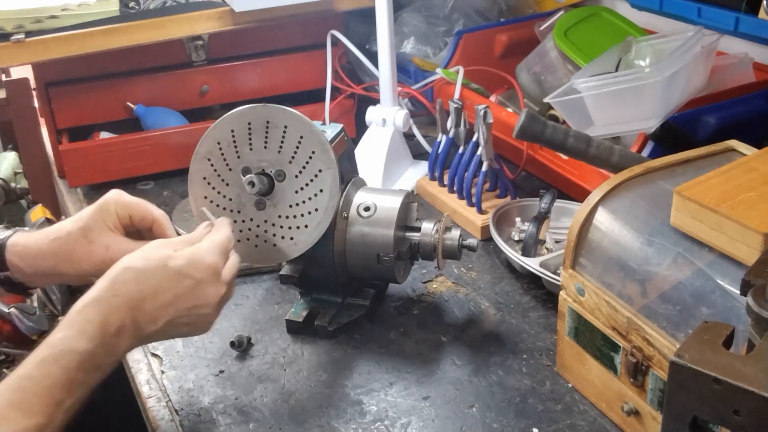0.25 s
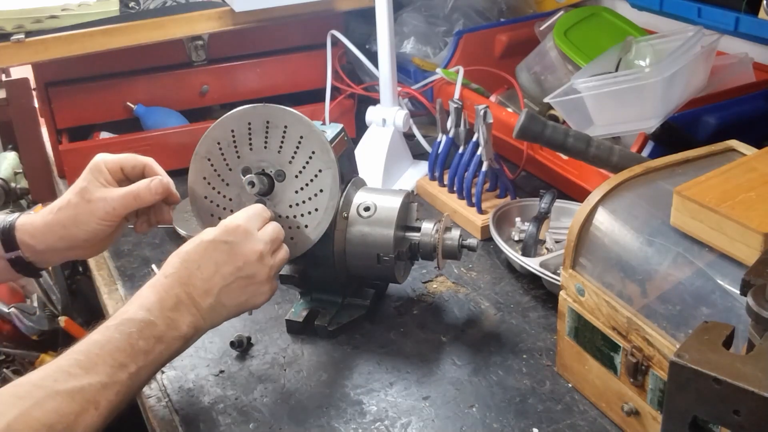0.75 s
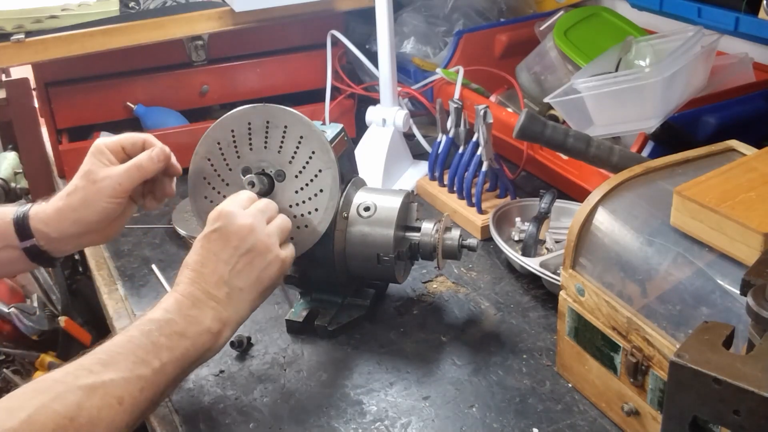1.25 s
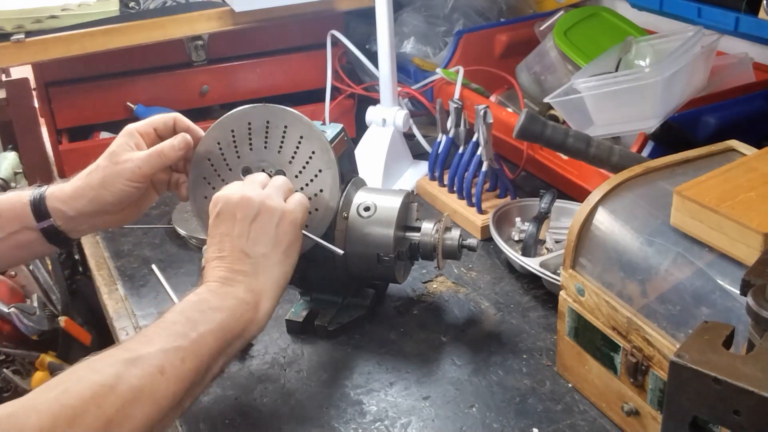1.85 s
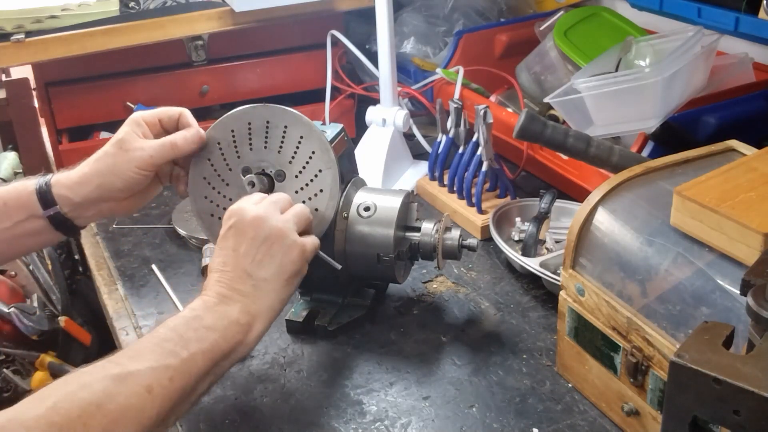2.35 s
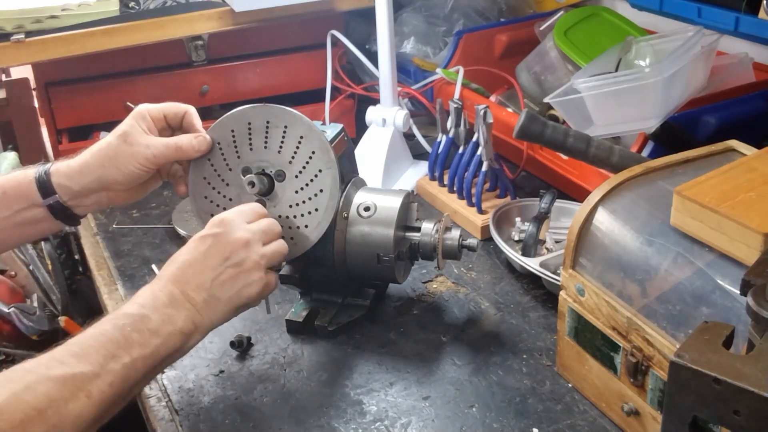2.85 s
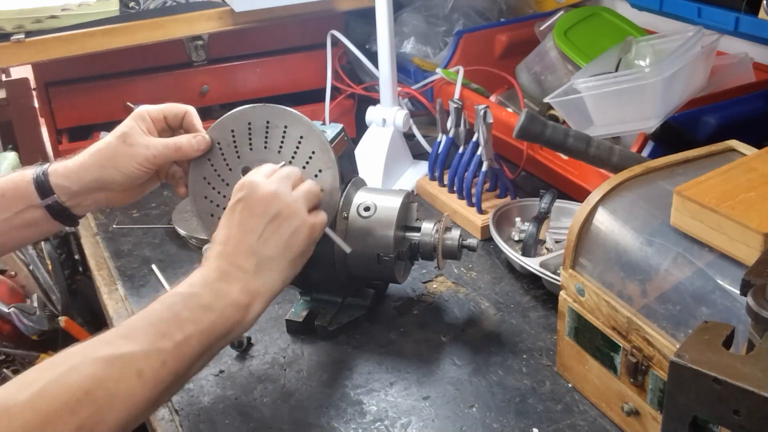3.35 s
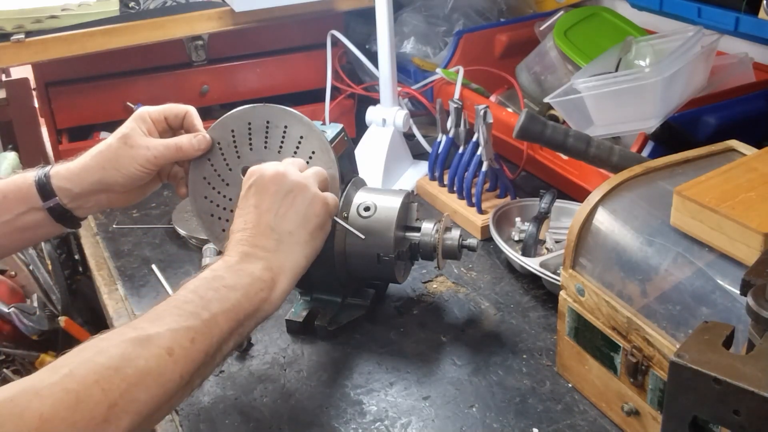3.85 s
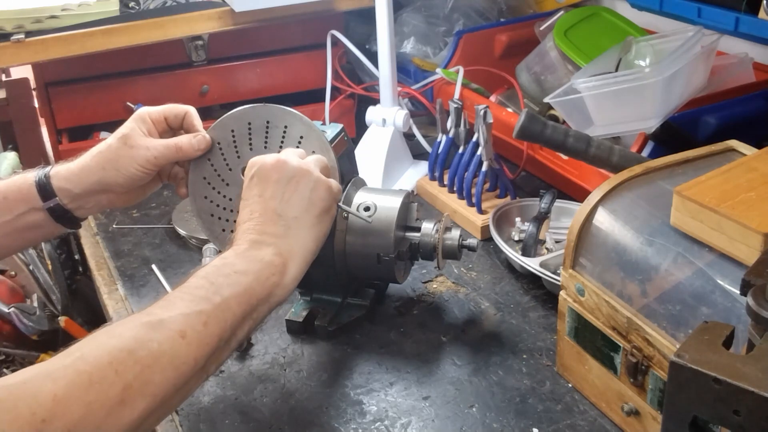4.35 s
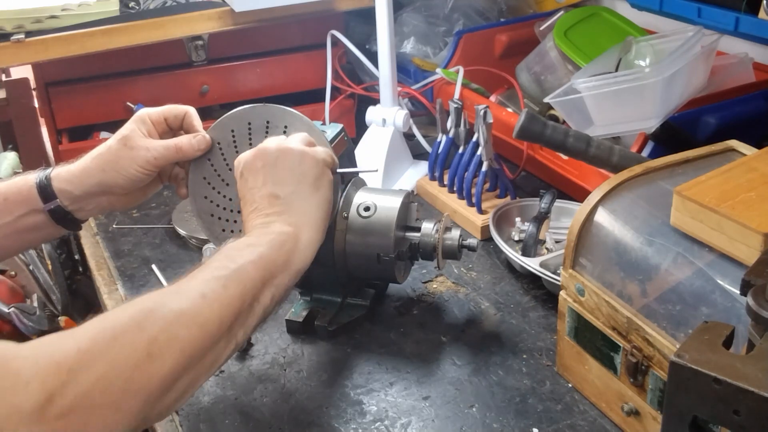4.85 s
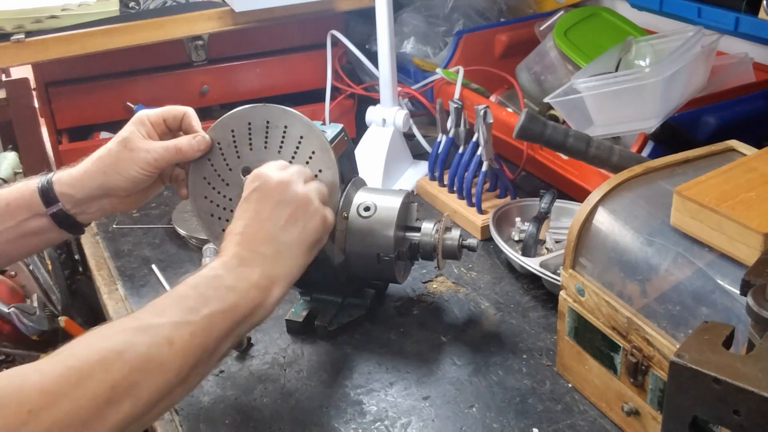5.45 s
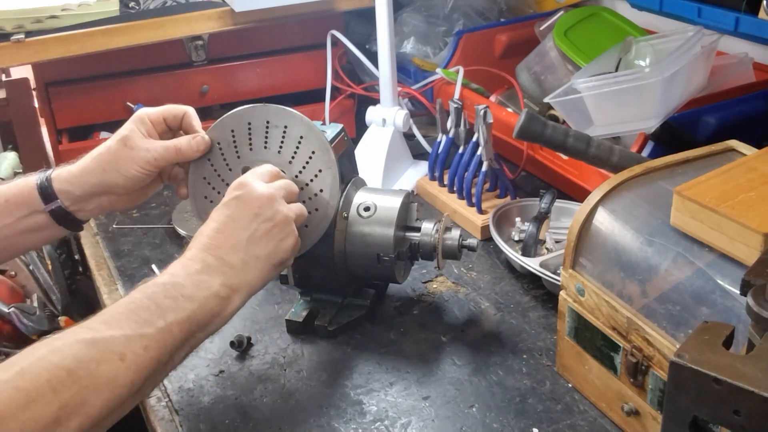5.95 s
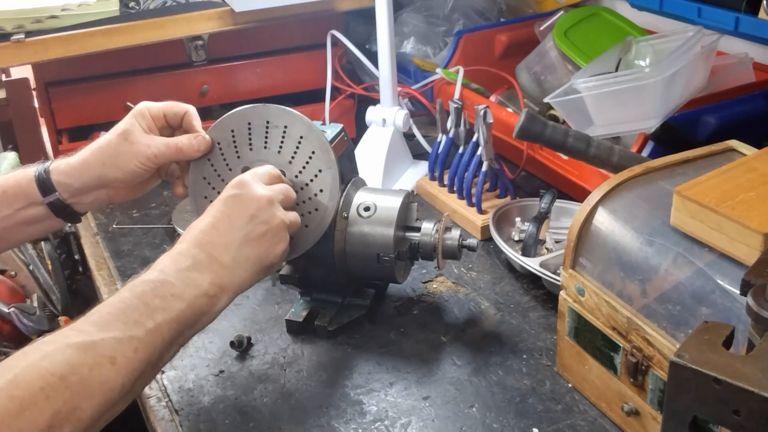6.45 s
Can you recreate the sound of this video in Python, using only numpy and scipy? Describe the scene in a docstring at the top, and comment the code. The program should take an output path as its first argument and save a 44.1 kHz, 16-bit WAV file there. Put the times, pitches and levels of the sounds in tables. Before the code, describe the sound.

A mechanical clock ticks and tocks from start to finish, a little more than two beats a second, each beat with a slight steely ring and the short echo of a small workshop. Under it lie a faint, steady rumble, hiss and hum. Close by, a hex key knocks softly on a steel plate at about 0.8 seconds and again, with more ring, at 2.1 seconds. Fingers brush the metal very faintly now and then. At about 3.1 seconds the key slides briefly and clinks, then seats in a screw with a sharp clank at 3.8 seconds, followed by several quick, bright clinks up to 4.2 seconds. Another small scrape and a few lighter clicks come around 4.5 to 4.7 seconds, and a last soft clink at 5.6 seconds. The clock then ticks on alone until the end, at about 6.7 seconds.

```python
"""From the start, a mechanical clock ticks and tocks over the rumble, hiss and hum of a small workshop:
its pallets strike the escape wheel, exciting the modes of the case. At 0.8 and 2.1 s a hex key knocks on
a steel dividing plate close by, and fingers brush the metal. From 3.1 to 5.7 s the key slides, seats and
clinks in the screws, each impact ringing key and plate. Then the clock is left beating in the room."""
import sys
import numpy as np
from scipy import signal
from scipy.fft import rfft, irfft
from scipy.io import wavfile
from scipy.ndimage import uniform_filter1d

SR = 44100
rng = np.random.default_rng(int(sys.argv[2]) if len(sys.argv) > 2 else 0)


def waveform_to_disk(signal):
    """Save audio, clipped to [-1, 1], as 16-bit WAV at the path in sys.argv[1]."""
    frames = np.transpose(np.atleast_2d(signal))
    scaled = np.clip(frames, -1, 1) * 32767
    samples = np.round(scaled).astype(np.int16)
    wavfile.write(sys.argv[1], SR, samples)


N = 295911
SIZE = 16384   # samples in one short sound; HZ and AGE are its frequency and time axes
HZ = np.maximum(np.fft.rfftfreq(SIZE, 1 / SR), 1)
AGE = np.arange(SIZE) / SR


def from_db(db):
    """Amplitude grows tenfold for every 20 dB."""
    return 10 ** (np.asarray(db) / 20)

def at_hz(points, hz):
    """Interpolation of a table along log frequency."""
    points = np.array(points)
    return np.interp(np.log(hz), np.log(points[:, 0]), points[:, 1])

def at_time(points, s):
    """Linear interpolation of a table along time."""
    return np.interp(s, *np.transpose(points))

def unit(x):
    """Normalisation of each channel to unit energy."""
    return x / np.sqrt(np.sum(x ** 2, axis=-1, keepdims=True) + 1e-20)

def stereo(mid, side, coherence):
    """Interaural coherence sets the shares of a common and an opposed signal."""
    return np.sqrt(1 + coherence) * mid + np.sqrt(1 - coherence) * side * [[1], [-1]]

def resonances(modes):
    """Modal superposition: steep-sided peaks sum to a body's power response."""
    return sum((from_db(db) / (1 + (2 * (HZ - hz) / width) ** 2)) ** 2 for hz, width, db in modes)

def brightness(tilt_db, pivot_hz):
    """Spectral tilt above 2 kHz, as a power gain: makes a tick or knock brighter or duller."""
    return from_db(tilt_db * np.log2(np.maximum(HZ, 2000) / pivot_hz)) ** 2

def ringing(power):
    """Causality: folding the cepstrum turns a power response into a minimum-phase ring."""
    cepstrum = irfft(np.log(power + 1e-12) / 2)
    cepstrum[1:SIZE // 2] *= 2
    cepstrum[SIZE // 2 + 1:] = 0
    return irfft(np.exp(rfft(cepstrum)))

def through(x, response):
    """Convolution of a short sound with a stereo impulse response."""
    return signal.fftconvolve(np.atleast_2d(x), response, axes=-1)[:, :SIZE]

def add(track, s, sound):
    """Superposition of a short stereo sound on the track at s seconds."""
    start = int(np.clip(round(s * SR), 0, N - 1))
    track[:, start:start + SIZE] += sound[:, :N - start]

def scatter(envelope, coherence, whitenings=3):
    """Dense random arrivals sum to noise under an envelope; whitening evens its spectrum."""
    x = stereo(*rng.standard_normal((2, SIZE)), coherence) * envelope
    onset = np.minimum(1, 2 * np.maximum.accumulate(envelope) / envelope.max())
    for _ in range(whitenings):
        spectrum = rfft(x)
        local_power = uniform_filter1d(np.abs(spectrum) ** 2, size=40, axis=-1)
        x = irfft(spectrum / np.sqrt(local_power + 1e-12)) * onset
    return unit(x)


# The room's noise floor. Each row: frequency in Hz, spectral density in dB.
ROOM_SPECTRUM = [(4, -56), (12, -55), (22, -60), (43, -71.3), (100, -80.3), (200, -86), (400, -89.5),
                 (680, -91.7), (810, -91.7), (1000, -97.3), (2000, -101.5), (5500, -104.8), (10500, -103.5),
                 (15500, -106)]
# Its likeness in the two ears. Each row: frequency in Hz, coherence from 0 to 1.
ROOM_COHERENCE = [(20, 0.31), (110, 0.37), (250, 0.06), (600, 0.32), (1200, 0.13), (12000, 0.03)]

def room_tone():
    """A diffuse field: steady rumble and hiss, only weakly coherent between the ears."""
    hz = np.maximum(np.fft.rfftfreq(N, 1 / SR), 1)
    mid, side = rfft(rng.standard_normal((2, N)))
    noise = stereo(mid, side, at_hz(ROOM_COHERENCE, hz))
    return irfft(noise * from_db(at_hz(ROOM_SPECTRUM, hz)), N) * np.sqrt(SR) / 2


# Faint tones of an appliance. Each row: frequency in Hz, width in Hz, level in dB.
HUM_TONES = [(398, 12, -79), (500, 12, -78), (599, 10, -74), (824, 6, -77), (6501, 20, -83)]

def hum():
    """Narrow-band noise is heard as a wavering tone."""
    hz, out = np.fft.rfftfreq(N, 1 / SR), 0
    for centre_hz, width_hz, db in HUM_TONES:
        noise = rfft(rng.standard_normal((2, N)))
        tone = irfft(noise / (1 + (2 * (hz - centre_hz) / width_hz) ** 2), N)
        out += from_db(db) * unit(tone) * np.sqrt(N)
    return out


# Decay in the cluttered room. Each row: frequency in Hz, time to fall 60 dB in seconds.
REVERB_TIMES = [(200, 0.42), (1000, 0.2), (3000, 0.19), (9000, 0.22), (15000, 0.17)]

def workshop(build_s, hold_s, coherence):
    """Reverberation: reflections build up, hold, then decay exponentially, the bass lasting longest."""
    decay_age = np.maximum(AGE - hold_s, 0)
    base_t60 = at_hz(REVERB_TIMES, 5500)
    build = 1 - np.exp(-(AGE / build_s) ** 2)
    spectrum = rfft(scatter(build * from_db(-60 * decay_age / base_t60), coherence))
    centres_hz, t60s = np.transpose(REVERB_TIMES)
    out = 0
    for t60, weights in zip(t60s, np.eye(len(t60s))):
        band = np.interp(np.log(HZ), np.log(centres_hz), weights)
        excess_db = -60 * decay_age * (1 / t60 - 1 / base_t60)
        out += irfft(spectrum * band) * from_db(np.minimum(excess_db, 20))
    tail_fade = from_db(-60 * np.maximum(AGE - base_t60, 0) / base_t60)
    return unit(out * tail_fade)


# The beat sometimes runs early. Each row: time in seconds, lead in seconds.
BEAT_LEAD = [(.03, .011), (.4, 0), (3.8, 0), (4.6, .009), (5.0, 0)]

def beats(first_s=.0265, period_s=.8337, tock_after_s=.404):
    """A balance beats twice a period, here unevenly; yields seconds and pallet (0 tick, 1 tock)."""
    for tick_s in np.arange(first_s, N / SR, period_s):
        for pallet, s in enumerate((tick_s, tick_s + tock_after_s)):
            if s < N / SR:
                yield s - at_time(BEAT_LEAD, s), pallet

def ping(hz=7986, rise_s=.008, hold_s=.015, t60_s=.1, gain_db=-46, pan_db=5):
    """Free vibration: a steel part of the escapement rings on, mostly to the right."""
    envelope = (1 - np.exp(-AGE / rise_s)) * from_db(-60 * np.maximum(AGE - hold_s, 0) / t60_s)
    pitch_hz = hz + rng.normal(0, 18)
    tone = np.sin(2 * np.pi * (pitch_hz * AGE + rng.random((2, 1))))
    return from_db([[gain_db - pan_db], [gain_db + pan_db]]) * envelope * tone


# Force on each pallet, drifting as the wheel train turns. Each row: time in seconds, force in dB.
TICK_DRIVE = [(.9, 2), (1.7, 0), (3.0, 1.1), (4.9, -0.5), (6.7, 0.2)]
TOCK_DRIVE = [(1.3, -2), (2.1, 1.4), (3.8, 2.5), (4.6, -0.5), (5.4, -0.5)]
# Strength of the steel ping. Each row: time in seconds, gain in dB.
PING_GAIN = [(0, 4), (1.1, 5.5), (2.5, -1.2), (4.9, -4), (6.1, 5)]
# Bare snap of a pallet on the escape wheel. Each row: frequency in Hz, level in dB.
SNAP_SPECTRUM = [(150, -19), (1000, -15), (1700, -16), (2100, -18.5), (2900, -19.5), (4000, -17),
                 (5000, -19.5), (6200, -20.5), (12000, -17), (16000, -47)]
# Case and movement. Each row: frequency in Hz, width in Hz, tick level in dB, tock level in dB.
CASE_MODES = [(304, 285, -6, -5.5), (572, 76, 0, -5), (790, 81, -10, -12.5), (1265, 96, -2, -29),
              (1414, 51, -2.5, -4), (1480, 26, -34, -12), (2375, 123, 4, -3.5), (2580, 140, -2, -13),
              (2443, 78, 1, -4.5), (2792, 76, -2, 2), (2864, 43, 3, .5), (3110, 152, 3.5, -4),
              (3440, 200, -10, -26), (4470, 280, -5.5, -13), (5040, 230, -14, -13.5), (7800, 200, -28, -12),
              (7980, 170, 0.5, -11), (8220, 2540, -13, -10.5), (9250, 88, 1.5, -20),
              (10000, 170, -5.5, -29), (10280, 200, -11, -7), (10880, 120, -4.5, -0.5),
              (11460, 500, -14, -7), (12550, 700, -11, -3.5), (13480, 540, -1, -6.5), (13800, 450, -13, -6),
              (15000, 400, -11, -16)]

def clock(lead_s=.005, slide_s=.0069, ear_lag_s=.00034, direct_db=-9, pan_db=.5,
          fixed_share=.68, vary_db=1.75):
    """Impact excitation: two pallets in turn ring the case, heard mostly through reflections."""
    out = np.zeros((2, N))
    # each pair holds the tick's value, then the tock's
    gain_db, ping_offset_db = (.24, -1.7), (4, -2)
    rest_tilt_db = (.53, -.6)   # per octave
    fullness = (.056, .21)   # a firmer beat is fuller: tilt lost per dB of force
    paths = (dict(build_s=.0075, hold_s=.019, coherence=.031),
             dict(build_s=.0082, hold_s=.024, coherence=.024))
    fixed_echoes = [workshop(**path) for path in paths]
    snap = from_db(at_hz(SNAP_SPECTRUM, HZ)) ** 2
    for s, pallet in beats():
        force_db = at_time((TICK_DRIVE, TOCK_DRIVE)[pallet], s)
        tilt_db = rest_tilt_db[pallet] - fullness[pallet] * force_db
        ping_db = ping_offset_db[pallet] + at_time(PING_GAIN, s)
        # the tooth slides onto the pallet; this reaches the right ear first
        slide = scatter(AGE * np.exp(-AGE / slide_s), coherence=0, whitenings=0)[0]
        direct = from_db(direct_db) * np.stack([np.roll(slide, round(ear_lag_s * SR)), slide])
        # every tooth lands a little differently
        modes = [(hz, width, db[pallet] + vary_db * rng.normal()) for hz, width, *db in CASE_MODES]
        case = ringing((snap + resonances(modes)) * brightness(tilt_db, pivot_hz=5300))
        echoes = np.sqrt(fixed_share) * fixed_echoes[pallet]
        echoes += np.sqrt(1 - fixed_share) * workshop(**paths[pallet])
        knock = through(case, direct + echoes) * from_db([[-pan_db], [pan_db]])
        beat = from_db(force_db) * knock + from_db(ping_db) * ping()
        add(out, s - lead_s, from_db(gain_db[pallet]) * beat)
    return out


# Fingers brush the steel. Each row: peak time in seconds, half-width in seconds, level in dB.
FINGER_STROKES = [(1.43, 0.035, -69), (3.32, .02, -63), (4.917, 0.025, -63.5), (5.257, 0.013, -59)]

def fingers(hz=10800, width_hz=4500):
    """Friction noise: skin sliding on steel gives a soft, high swish."""
    t = np.arange(N) / SR
    pressure = sum(from_db(db) * np.exp(-((t - s) / half_s) ** 2) for s, half_s, db in FINGER_STROKES)
    swish = unit(ringing(resonances([(hz, width_hz, 0)])))
    return pressure * signal.fftconvolve(rng.standard_normal((2, N)), swish[None], axes=-1)[:, :N]


# The key seats in a screw head. Each row: start in seconds, frequency in Hz, level in dB.
SCREW_CLANKS = [(3.752, 2750, 2.5), (3.8905, 2820, -6), (4.06, 2520, -9.5), (5.635, 2380, -8)]

def screws(width_hz=170):
    """Damped resonance: each screw rings briefly, at a pitch set by how tightly it sits."""
    out = np.zeros((2, N))
    for s, hz, db in SCREW_CLANKS:
        ring = ringing(resonances([(hz, width_hz, db)]))
        add(out, s, through(ring, workshop(build_s=.001, hold_s=.0037, coherence=.15)))
    return out


# The key knocks on screws and plate. Each row: start in seconds, length in seconds,
# levels of key, plate and click in dB, tilt in dB per octave.
KEY_KNOCKS = [(0.789, 0.0095, -28, -43, -11.5, -5), (2.1393, 0.00064, -17, -0.5, -7.5, -5.5),
              (3.185, 0.0009, -1.5, -22, -8.5, -1), (3.7518, 0.0015, -5, -35, 1.7, 6),
              (3.8854, 0.0014, -14, -25, -25, -5), (3.8902, 0.0014, -5.5, -15.5, -1, -1),
              (4.057, 0.0077, -12.5, -39, -8.5, -1.5), (4.1796, 0.0022, -10, -32, -16, -1.5),
              (4.628, 0.0055, -23, -26.5, -19, 7.5), (4.635, 0.003, -18, -25, -8.5, -3.5),
              (4.664, 0.0013, -16.5, -31, -19, -7), (5.635, 0.0057, -33, -31.5, -18, -3)]
# The key slides, feeling for a screw head. Each row: start in seconds, key level in dB.
KEY_SLIDES = [(3.116, -29.5), (4.523, -30)]

def contacts(rebound_after_s=.033, rebound_length_s=.0025, loss_db=21, slide_s=.029, slide_tilt_db=-4.5):
    """Inelastic impact: each knock rebounds once, weaker. Yields these and the slides as knock rows."""
    for s, length_s, *levels_db, tilt_db in KEY_KNOCKS:
        yield s, length_s, *levels_db, tilt_db
        yield s + rebound_after_s, rebound_length_s, *(db - loss_db for db in levels_db), tilt_db
    for s, key_db in KEY_SLIDES:
        plate_db, click_db = key_db - 22, key_db + 7
        yield s, slide_s, key_db, plate_db, click_db, slide_tilt_db


# Key and plate, damped by the fingers. Each row: frequency in Hz, width in Hz, level in dB.
KEY_MODES = [(5550, 730, -7), (8360, 1140, 7), (9110, 570, 17), (9700, 190, 15.5), (9400, 290, 16.5),
             (14150, 620, 4)]
PLATE_MODES = [(1494, 115, -4.5), (3700, 610, -1.5), (7000, 1100, 11), (7990, 580, 17.5), (8640, 500, 12),
               (10300, 910, 14), (11640, 980, 15), (14500, 1300, 8.5)]
# Steel meeting steel. Each row: frequency in Hz, level in dB.
CLICK_SPECTRUM = [(200, -8), (1000, -12), (2000, -20.5), (2800, -10), (4000, -10), (5200, -3.5),
                  (6200, -11.5), (9000, -6.5), (12500, -10.5), (16000, -26)]

def hex_key(direct_db=-3, room_db=-4, bench_db=-12, bench_delay_s=.0043, clean_s=.00026, nearby_s=.12):
    """Modal excitation: each contact rings key and plate, reflected by the bench and the room."""
    out = np.zeros((2, N))
    key, plate = resonances(KEY_MODES), resonances(PLATE_MODES)
    click = from_db(at_hz(CLICK_SPECTRUM, HZ)) ** 2
    for s, length_s, key_db, plate_db, click_db, tilt_db in contacts():
        power = key * from_db(key_db) ** 2 + plate * from_db(plate_db) ** 2
        power += click * from_db(click_db) ** 2
        steel = ringing(power * brightness(tilt_db, pivot_hz=6550))
        # the briefer the contact, the more clean blow; a long one is all grit
        clean_share = np.exp(-length_s / clean_s)
        grit = scatter(AGE * np.exp(-2 * AGE / length_s), coherence=.17, whitenings=0)
        blow = np.roll(AGE == 0, round(length_s * SR / 2))
        force = np.sqrt(clean_share) * blow + np.sqrt(1 - clean_share) * grit
        direct = unit(through(steel, force)) * np.linalg.norm(steel)
        # near the bench the early reflections outweigh the late ones
        echoes = workshop(build_s=.0012 + length_s, hold_s=.0026 + length_s, coherence=.056)
        room = through(steel, unit(echoes * np.exp(-AGE / nearby_s)))
        add(out, s, from_db(direct_db) * direct + from_db(room_db) * room)
        add(out, s + bench_delay_s, from_db(bench_db) * direct)
    return out


def scene():
    """Linear superposition of clock, hand work and room."""
    return clock() + hex_key() + screws() + fingers() + room_tone() + hum()

def record(dry):
    """Band limiting: an elliptic low-pass cuts steeply above 15.7 kHz."""
    return signal.sosfilt(signal.ellip(10, .1, 70, 15700, fs=SR, output="sos"), dry)


dry = scene()
out = record(dry)
waveform_to_disk(out)
```